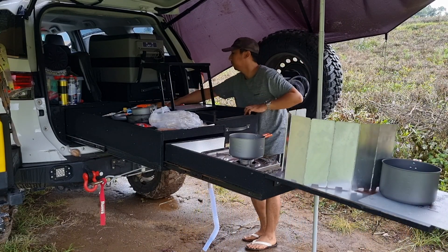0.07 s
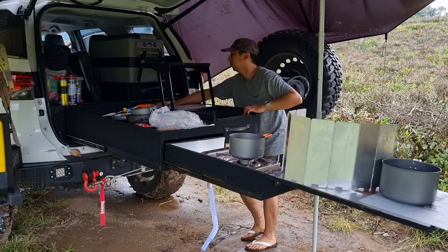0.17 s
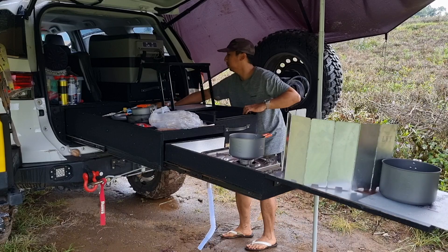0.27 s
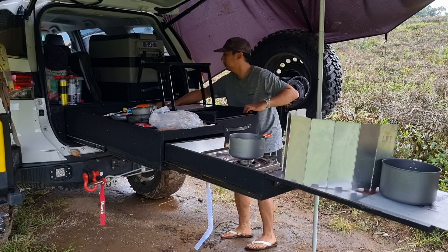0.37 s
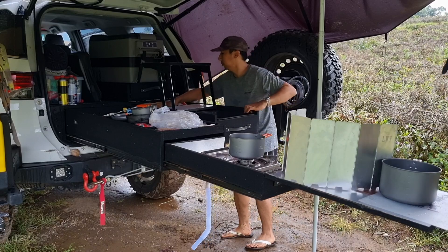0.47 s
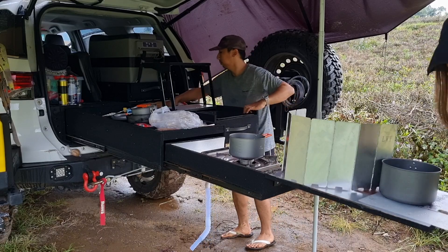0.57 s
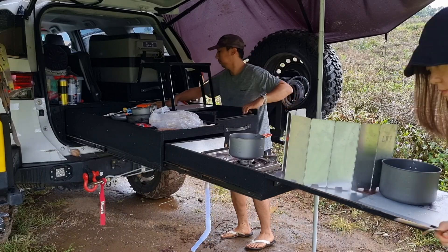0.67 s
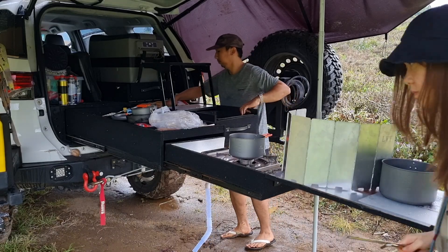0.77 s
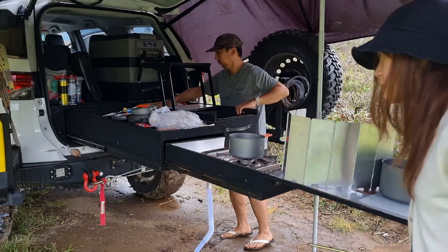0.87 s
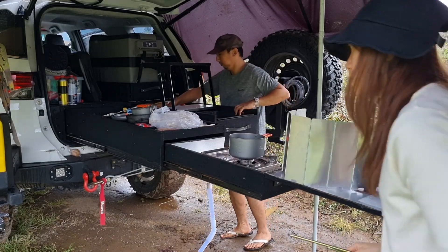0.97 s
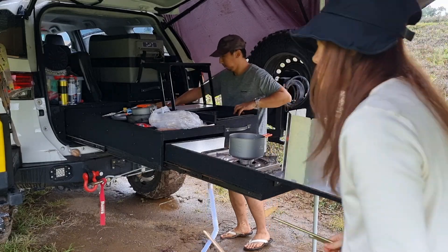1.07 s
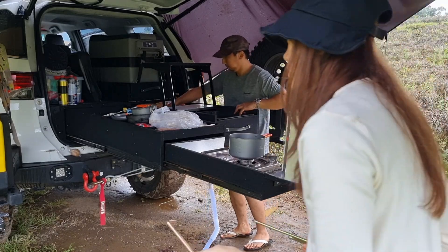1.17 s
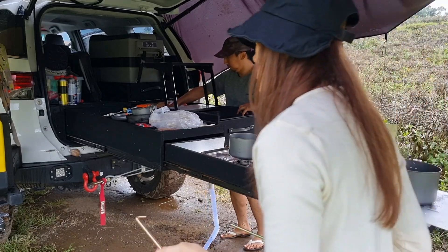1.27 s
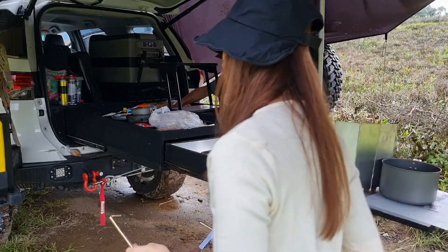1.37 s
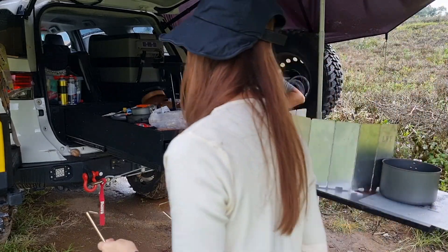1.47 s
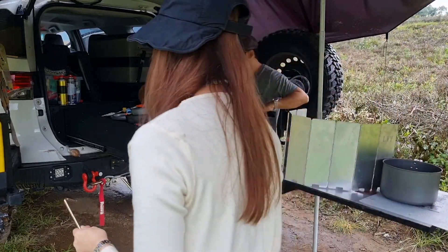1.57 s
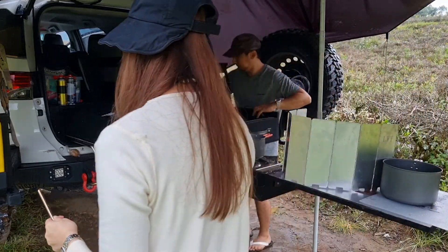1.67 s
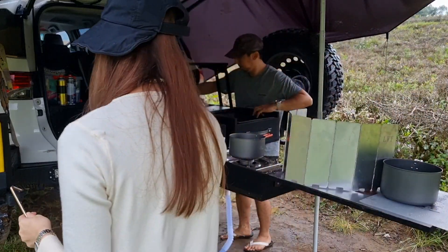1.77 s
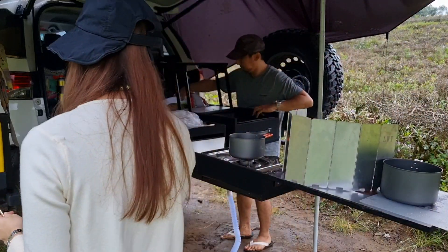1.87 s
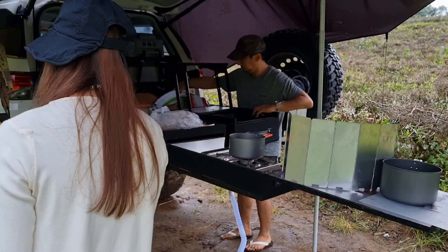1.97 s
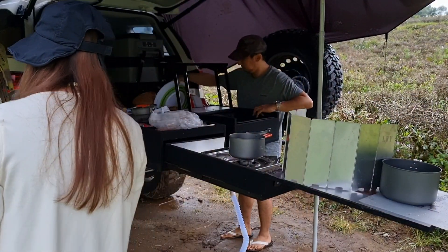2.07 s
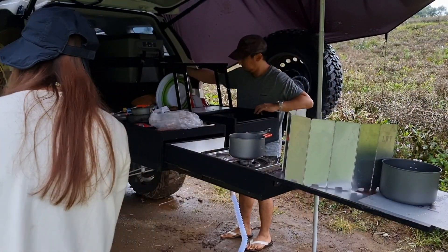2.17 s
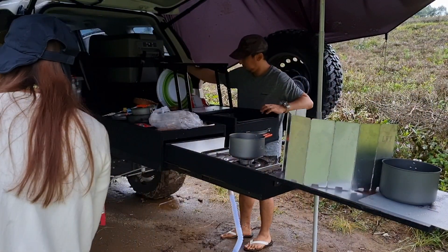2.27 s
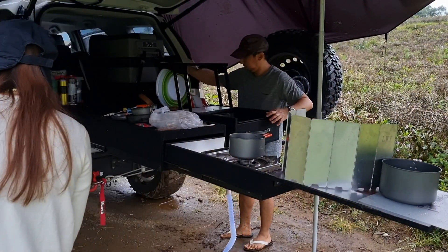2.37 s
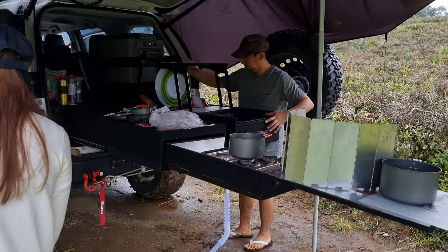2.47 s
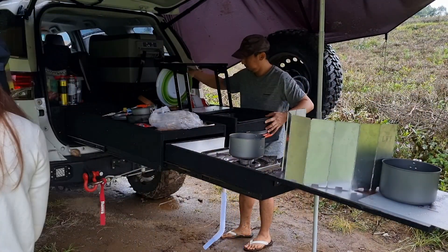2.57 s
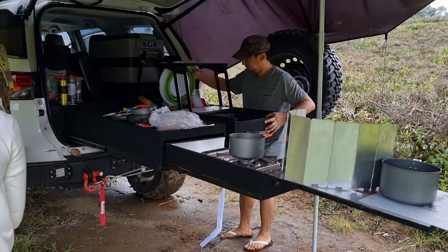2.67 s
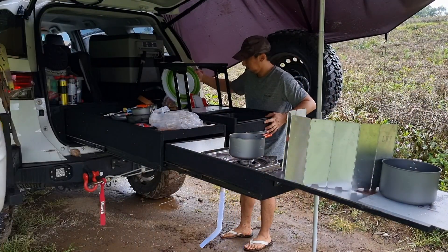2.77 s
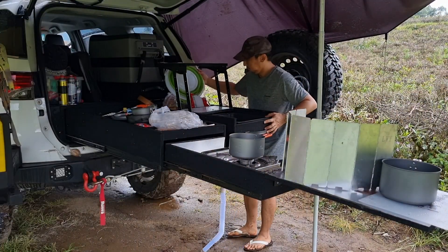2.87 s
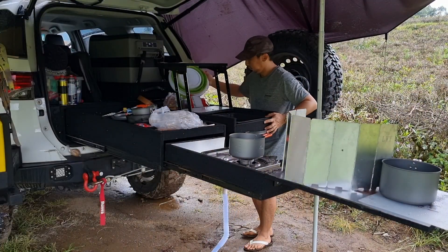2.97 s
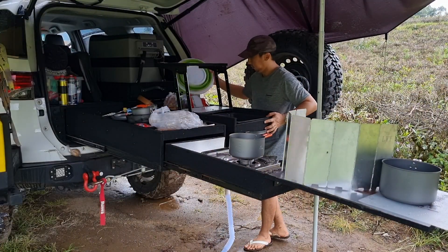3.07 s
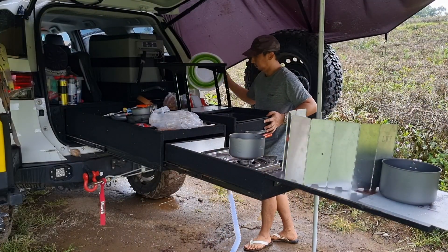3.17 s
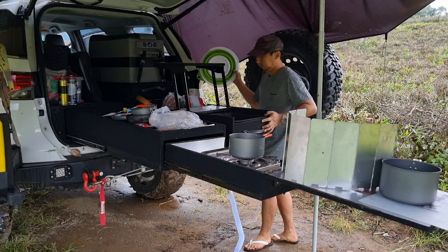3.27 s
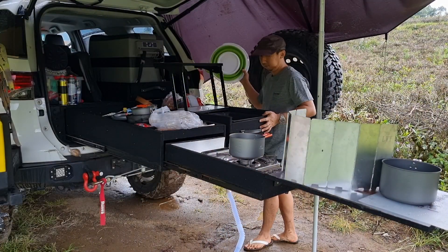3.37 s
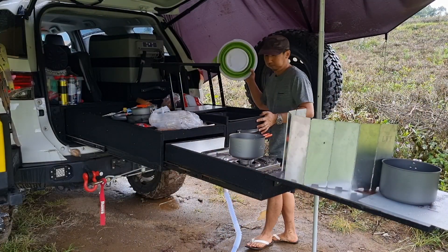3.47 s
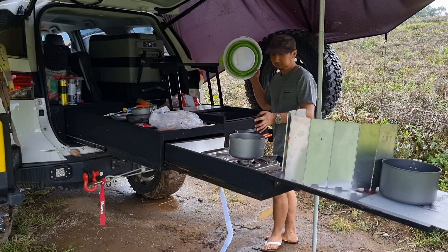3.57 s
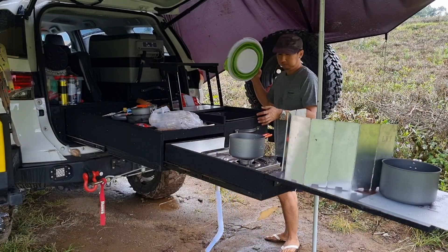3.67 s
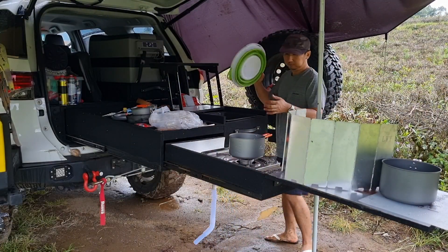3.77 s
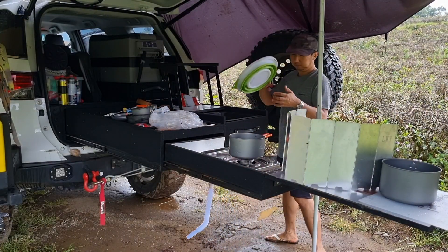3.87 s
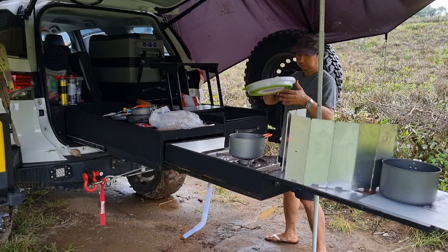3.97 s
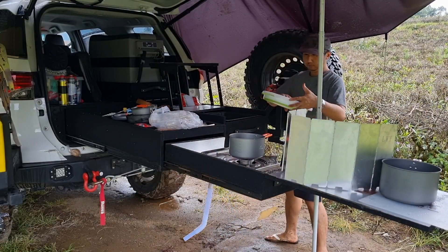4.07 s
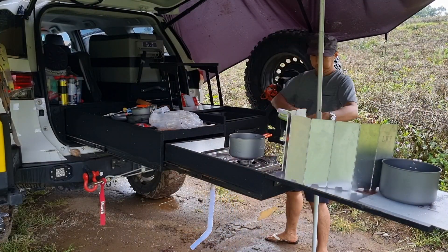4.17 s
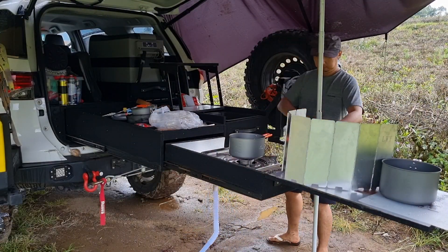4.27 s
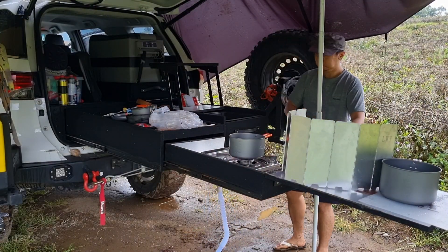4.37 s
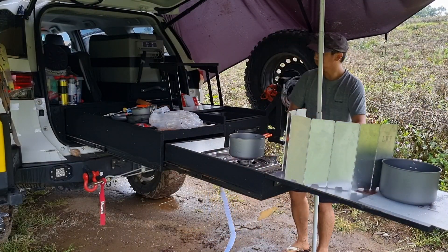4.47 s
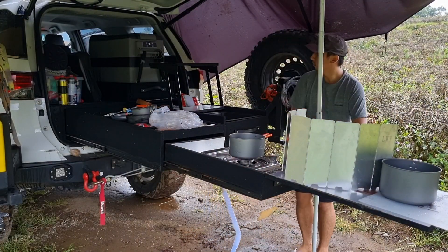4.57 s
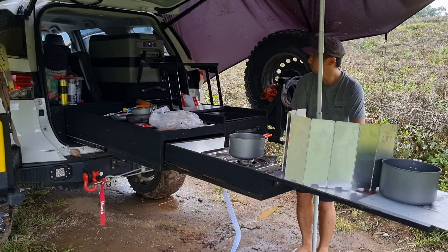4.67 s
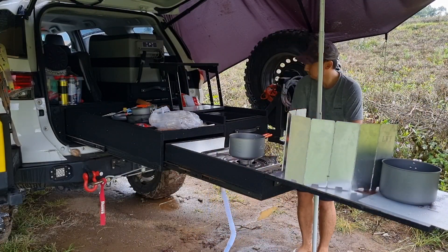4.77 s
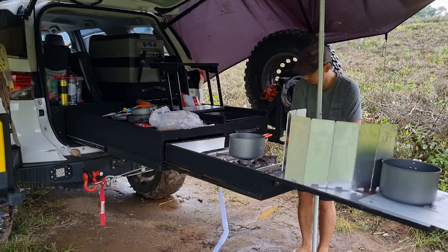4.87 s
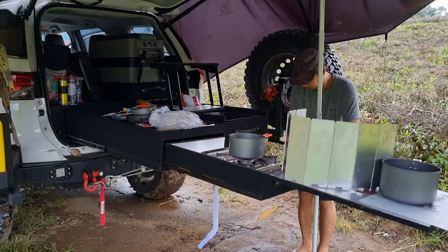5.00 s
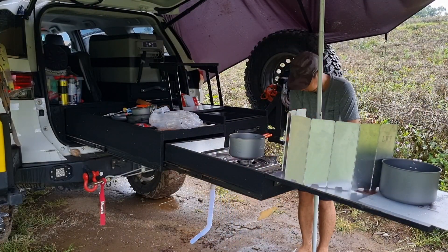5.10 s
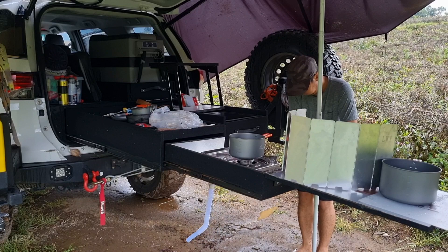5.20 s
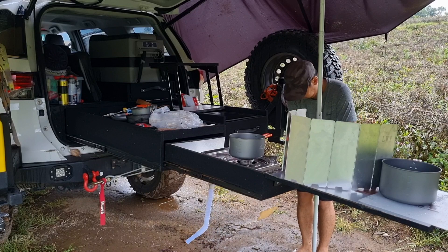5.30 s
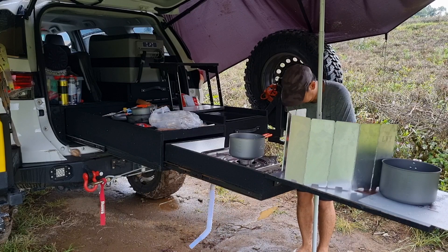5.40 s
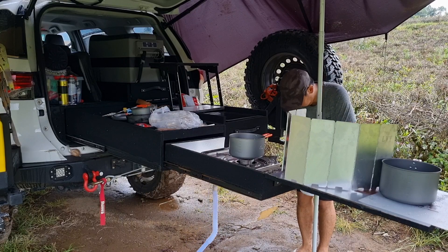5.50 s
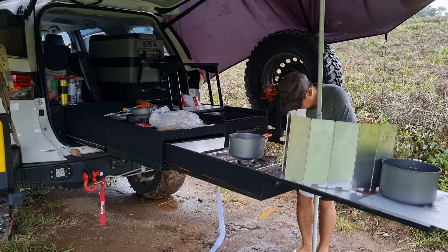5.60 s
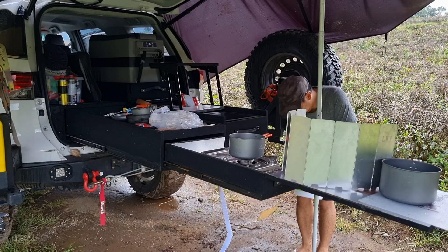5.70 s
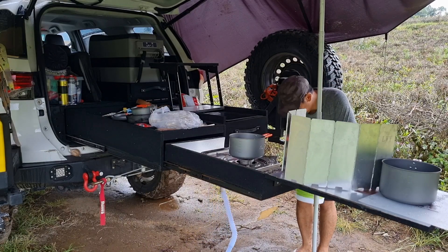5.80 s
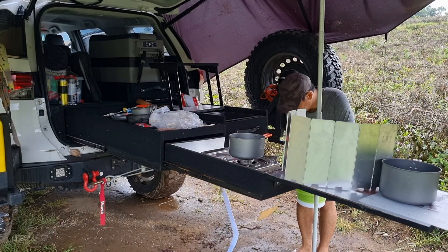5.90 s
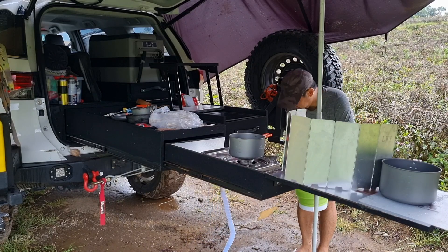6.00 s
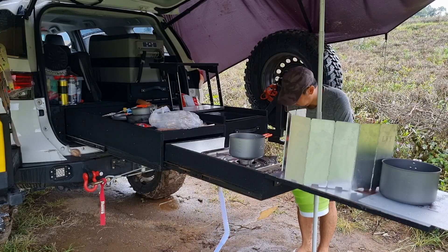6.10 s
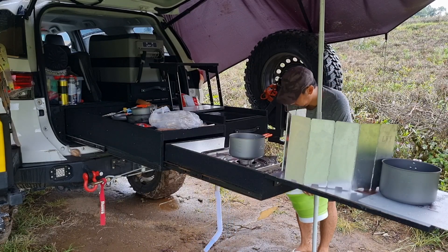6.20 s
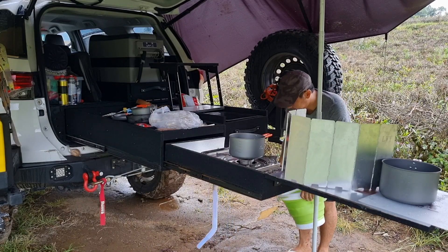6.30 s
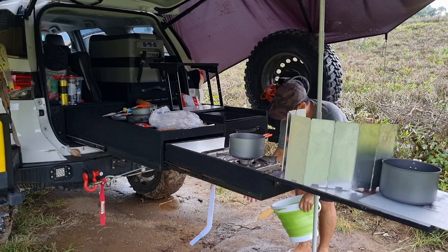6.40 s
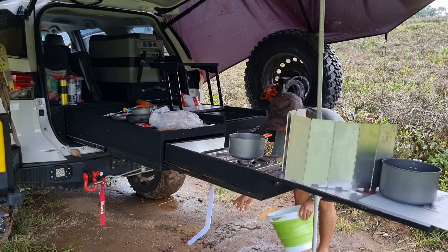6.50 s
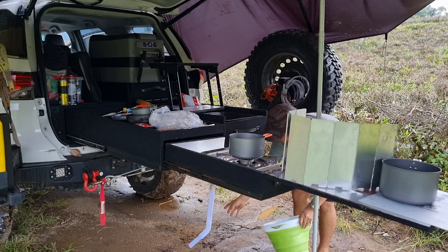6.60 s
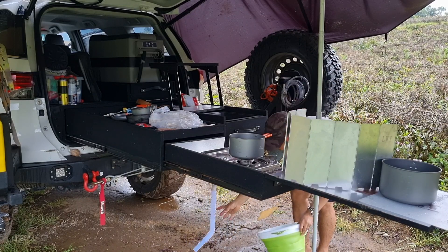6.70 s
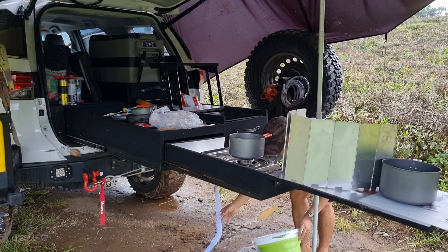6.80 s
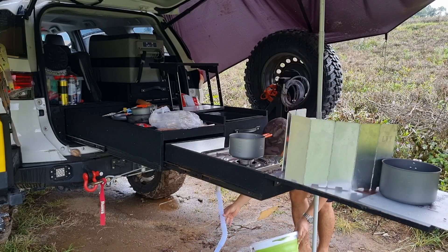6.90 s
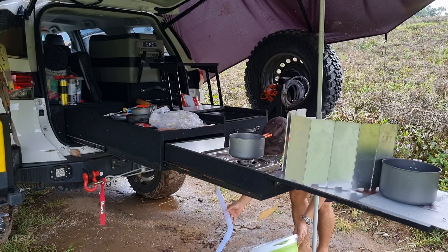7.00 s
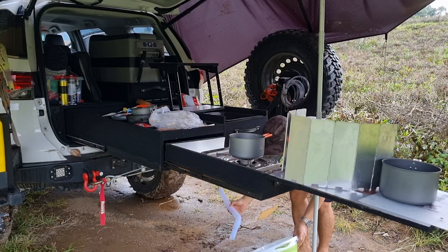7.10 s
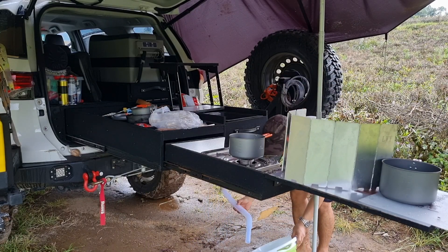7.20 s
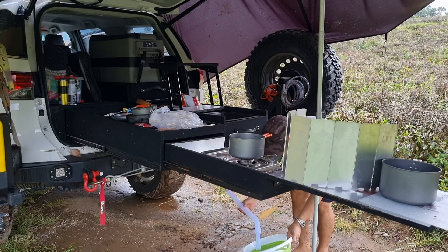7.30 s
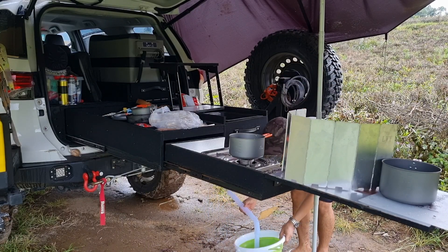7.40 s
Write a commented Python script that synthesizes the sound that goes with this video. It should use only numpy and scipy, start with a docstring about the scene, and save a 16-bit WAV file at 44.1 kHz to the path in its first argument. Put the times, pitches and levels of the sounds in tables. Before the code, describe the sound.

A soft, low outdoor rumble and faint insects run throughout at a camp kitchen. From the start, someone nearby rummages in a drawer: packing crackles, and pans slide with a hollow hum and clack together, busiest between 1.3 and 2.5 seconds. A small bird whistles faintly at about 0.7 seconds. Cloth zips briefly over an edge at 1.4, and light hollow thumps follow around 2.3. After 3 seconds the rustling is quieter. Metal utensils jingle brightly close by at about 3.2 and 4.3, with a sharp knock and thump at 3.7. Between 5.2 and 5.7 a folding plastic tub is pushed open in several hollow thumps, the loudest sounds, its walls springing back among small clinks and distant whistles. One softer knock comes at 6.2. The handling dies away to tiny clinks, and a bird gives a few raspy chirps from 7 seconds.

```python
"""A camp kitchen under an awning, over a low outdoor rumble and insects. From the start someone rummages
in a drawer: pans slide with a hum of friction and clack together, and packing crackles as it creases.
A small bird whistles, cloth zips over an edge, and the first hollow thumps sound. After three seconds
metal utensils jingle close by in their free modes; after five, a folding plastic tub is thumped open,
its walls flexing and springing back. The handling dies away, and a bird chirps near the end."""
import sys
import numpy as np
from scipy import signal
from scipy.fft import rfft, irfft, next_fast_len
from scipy.io import wavfile
from scipy.ndimage import uniform_filter1d

SR = 44100
rng = np.random.default_rng(int(sys.argv[2]) if len(sys.argv) > 2 else 0)


def wav_record(signal):
    """Record a signal, one row per channel, as 16-bit PCM in the file named by sys.argv[1]."""
    frames = np.transpose(np.atleast_2d(signal))
    bounded = np.clip(frames, -1, 1)
    # unit amplitude maps onto the largest positive 16-bit level
    quanta = np.round(bounded * 32767).astype(np.int16)
    wavfile.write(sys.argv[1], SR, quanta)


N = 328545
TIME = np.arange(N) / SR

# Spectra of the open air, the drawer under sliding gear, hard contacts, packing and small handling.
# Each row: frequency in Hz, relative spectral level in dB.
AIR_SPECTRUM = [(20, -34), (32, -16), (48, -3.5), (70, -1), (110, 0), (160, -8), (250, -17.5), (400, -22.5),
                (800, -26.5), (1500, -36.5), (3000, -31), (5000, -42), (8500, -36), (10500, -56),
                (16000, -46)]
DRAWER_SPECTRUM = [(120, -37), (190, -8.5), (260, -2), (340, -1), (520, -3.5), (650, -9), (850, -13),
                   (1250, -17.5), (2000, -30), (3500, -61), (7000, -72)]
CONTACT_SPECTRUM = [(88, -47), (150, 3.5), (309, 5.5), (774, -2), (905, -6), (1340, -4), (1500, -5.5),
                    (1940, -5.5), (2270, -8.5), (6260, -24.5), (16000, -54.5)]
PACKING_SPECTRUM = [(180, -6), (300, -17), (348, 0.5), (418, -34), (624, -6), (1300, -10.5), (1870, -9.5),
                    (3890, -11.5), (11300, -21.5), (14200, -19.5), (16000, -25)]
HANDLING_SPECTRUM = [(400, -20), (900, -8), (1800, -4.5), (3500, -5), (6000, -10.5), (10000, -17.5),
                     (16000, -15)]
# Insect choruses. Each row: centre in Hz, resonator bandwidth in Hz, level in dB.
INSECT_BANDS = [(6450, 230, -82.5), (7960, 700, -80)]
# Hand movements that drag gear, crumple packing and turn things over.
# Each row: time of the peak in seconds, level in dB, swell in seconds, release in seconds.
SHOVE_STROKES = [(.01, -53, 0.057, .15), (.39, -46.5, 0.05, 0.27), (.93, -54, 0.2, .2),
                 (1.345, -39.5, .11, 0.16), (1.52, -38.5, 0.47, 0.41), (1.94, -51.5, 0.15, 0.32),
                 (2.18, -39.5, 0.073, 0.07), (2.42, -46, 0.17, 0.2), (2.77, -53.5, 0.27, 0.11),
                 (3.34, -49.5, 0.29, 0.46), (3.83, -56, 0.2, .2), (4.55, -60, 1, 0.43)]
CRUMPLE_STROKES = [(.19, -43, 0.057, 0.023), (.27, -39, 0.11, 0.021), (.385, -44.5, 0.073, 0.18),
                   (.465, -44.5, 0.24, 0.12), (.55, -54, 0.048, 0.073), (.63, -44.5, 0.084, 0.066),
                   (.76, -48.5, 0.16, .12), (.86, -51, .06, .12), (.92, -44.5, 0.17, 0.12),
                   (1.03, -46.5, 0.28, 0.031), (1.36, -41.5, 0.17, 0.075), (1.7, -43.5, 0.37, 0.16),
                   (1.802, -38, 0.031, .1), (1.855, -39.5, .1, 0.21), (1.92, -39, 0.098, 0.12),
                   (2.14, -36.5, 0.08, 0.093), (2.397, -43.5, 0.009, 0.044), (2.765, -51, 0.017, 0.17)]
HANDLING_STROKES = [(3.4, -64.5, .5, 1.0), (3.79, -53, 0.38, 0.25), (4.5, -64.5, 0.67, 3.1),
                    (5.6, -73, 0.61, 1.5), (6.35, -69, .2, 0.82)]
# Clacks, scuffs and ticks. Each row: start in seconds, level in dB, contact length in seconds,
# tilt in dB per octave, body resonance in Hz.
CONTACTS = [(0.012, -51, 0.02, 2, 1130), (0.237, -46, 0.014, -0.5, 1660), (0.515, -41.5, 0.0037, 16, 5160),
            (0.599, -41, 0.0042, -0.5, 810), (0.711, -43, .003, -8, 663), (1.1695, -45, 0.0017, 5, 2990),
            (1.7763, -37, 0.0024, 9.5, 3080), (2.012, -40, 0.0092, -2.5, 1350),
            (2.044, -43, 0.0018, 10, 3800), (2.105, -37, 0.015, 2.5, 1420), (2.131, -38.5, 0.033, 3, 750),
            (2.333, -45.5, 0.012, -2.5, 1160), (2.389, -41.5, 0.013, 2.5, 2800),
            (2.509, -57, 0.0062, 10, 1090), (2.694, -52.5, 0.0078, 2, 1500), (2.747, -49.5, 0.024, 8, 1840),
            (2.814, -48.5, 0.0072, 10.5, 2030), (2.919, -54.5, 0.004, 1.5, 5000),
            (3.617, -51, 0.0086, 0.5, 940), (3.742, -30, 0.012, 4, 800), (3.794, -53, 0.027, -4, 815),
            (4.038, -55.5, 0.02, -1, 2230), (4.096, -57.5, 0.011, -0.5, 1520),
            (4.288, -54.5, 0.035, 5.5, 2200), (4.419, -44, 0.012, 4, 1650), (4.491, -57, 0.033, 16, 1770),
            (4.619, -48.5, 0.0097, 5.5, 2120), (4.723, -53, 0.024, -2.5, 866),
            (5.1805, -30.5, 0.0027, 1, 3100), (5.186, -38, 0.0047, 4, 920),
            (5.263, -58.5, 0.0098, 14, 3560), (5.383, -43, 0.023, -3, 860), (5.483, -47, 0.023, -4.5, 706),
            (5.644, -34, .011, -5.5, 704), (5.665, -57, 0.05, 0, 1900), (5.901, -51.5, 0.018, 0.5, 1920),
            (6.2105, -50.5, 0.0011, 8, 6500), (6.231, -42, 0.014, 5, 2720),
            (6.995, -59.5, 0.0018, 5.5, 3830)]
# Slurred whistles. Each row: start and length in seconds, first, middle and last pitch in Hz, level in dB.
BIRD_WHISTLES = [(0.726, 0.083, 4080, 3680, 2878, -61), (3.788, 0.047, 3930, 3590, 3150, -65),
                 (3.883, 0.061, 2110, 2510, 2750, -61), (5.02, .21, 3120, 2790, 2760, -73.5),
                 (5.331, 0.16, 1886, 3940, 2680, -68.5), (5.478, 0.043, 2810, 2880, 3100, -72),
                 (5.656, 0.04, 3080, 2350, 1820, -69), (6.884, 0.17, 3480, 3040, 2650, -80),
                 (7.17, 0.047, 3520, 3260, 2720, -79)]
# Raspy double chirps. Each row: start in seconds, level in dB.
BIRD_CHIRPS = [(7.046, -68.5), (7.275, -60.5), (7.358, -59.5), (7.415, -65)]
# Cloth drawn over a smooth edge. Each row: time in seconds, pitch in Hz, level in dB.
ZIP_PATH = [(1.15, 6700, -72), (1.24, 6740, -58), (1.345, 7400, -44), (1.37, 8070, -34), (1.395, 8300, -52),
            (1.43, 8240, -65)]
# Flexes of a plastic wall. Each row: start in seconds, pitch in Hz, peak level in dB,
# rebound in dB against the peak, side partials in dB against the main one.
WALL_FLEXES = [(1.305, 64.5, -42, -20, -12), (2.233, 82, -51, -25, -17), (2.271, 515, -41.5, -8, -8),
               (2.35, 322, -36, -7, -6), (2.419, 293, -38, -8, -7), (2.505, 323, -41, 1, -2.5),
               (3.746, 442, -29.5, -7, -8), (3.764, 308, -36.5, -12, -20), (3.801, 790, -38.5, -6, -20),
               (4.733, 344, -40.5, -2.5, -24), (5.1744, 392, -16, -22, -29), (5.34, 394, -37.5, -30, -21),
               (5.388, 405, -24.5, 0.5, -8.5), (5.3957, 297, -22.5, -12, -15),
               (5.477, 360, -23.5, -24, -26), (5.487, 349, -14, -9, -25), (5.6, 377, -39, -3, -13),
               (5.643, 277.4, -15.5, -15, -13), (5.69, 272, -36.5, -8, -22), (5.716, 342, -42.5, -6, -22),
               (5.922, 366, -42, -11, -25), (6.232, 339, -33.5, -8.5, -35)]
# Side partials of that wall. Each row: multiple of the pitch, relative level in dB.
WALL_PARTIALS = [(.335, -5), (1.58, 1), (2.3, -10)]
# Modes of a utensil. Each row: frequency in Hz, relative level in dB, time to fall 60 dB in seconds.
UTENSIL_MODES = [(2649, -5, 0.093), (3360, -8, 0.19), (3786, -12, .15), (4362, -5.5, 0.057),
                 (4835, -3.5, 0.15), (6300, -12, 0.09), (6438, -4.5, 0.21), (6850, -2, 0.063),
                 (7400, -8, 0.11), (8990, 1, 0.13), (8870, -18, 0.12), (9290, -5, 0.18), (9950, -12, 0.28),
                 (9750, -41, .13), (11490, -0.5, 0.089), (12400, 3, 0.1), (12450, -24, 0.11),
                 (14100, -12, 0.14), (14345, -9, .13), (14800, -15, 0.089), (14700, 4.5, 0.1),
                 (15160, -6, 0.09), (15100, -13, .07)]
# Jingles. Each row: start in seconds, level in dB, chatter length in seconds, leading mode in Hz,
# lift of that mode in dB.
UTENSIL_JINGLES = [(3.119, -60, .036, 9290, -9), (3.154, -44.5, .028, 6438, 18.5),
                   (3.249, -58.5, 0.018, 11490, 9), (3.389, -69, 0.029, 4835, 9),
                   (3.567, -59, 0.023, 4362, 18), (3.63, -68.5, 0.041, 9290, 7),
                   (4.3234, -42.5, 0.047, 6850, 7), (4.59, -65, 0.032, 6850, 19),
                   (4.809, -60, 0.018, 4835, 13), (5.032, -75, 0.01, 9290, 10),
                   (5.617, -50, .022, 4835, 14.5), (5.721, -72.5, .012, 6850, 21),
                   (5.817, -63.5, .028, 4362, 16), (5.9783, -51.5, .018, 7400, 0),
                   (6.844, -63, .008, 4362, 20.5), (6.935, -72, .007, 8870, 25),
                   (7.16, -71, 0.0053, 11490, 14), (7.349, -70, 0.0085, 6850, 21)]


def undb(db):
    """Amplitude grows tenfold for every 20 dB."""
    return 10 ** (np.asarray(db) / 20)


def unit(x):
    """Normalisation to an rms of 1."""
    return x / np.sqrt(np.mean(x ** 2) + 1e-20)


def fade(t, t60):
    """Free vibration decays exponentially, by 60 dB in t60 seconds."""
    return np.exp(-np.log(1000) * t / t60)


def colour(x, spectrum, tilt_db=0):
    """Spectral shaping by a (Hz, dB) curve, tilted by tilt_db per octave."""
    size = next_fast_len(x.shape[-1])
    octave = np.log2(np.fft.rfftfreq(size, 1 / SR) + 1)
    hz, db = np.transpose(spectrum)
    tilt = tilt_db * (np.clip(octave, np.log2(hz[0]), np.log2(hz[-1])) - 10)
    gain = undb(np.interp(octave, np.log2(hz), db) + tilt)
    return irfft(rfft(x, size) * gain, size)[..., :x.shape[-1]]


def resonance(x, hz, width):
    """A damped two-pole resonator passes a band, with gain 1 at its centre."""
    return signal.lfilter(*signal.iirpeak(min(hz, .45 * SR), max(hz / width, .5), fs=SR), x)


def wander(rate, size=N):
    """Smooth random fluctuation of rms 1, with rate new values a second."""
    hold = max(int(SR / rate), 1)
    steps = np.repeat(rng.standard_normal(size // hold + 2), hold)
    return unit(uniform_filter1d(steps, hold))[:size]


def add(out, s, x):
    """Superposition: a sound joins the mix at s seconds."""
    i = max(int(s * SR), 0)
    out[:, i:i + x.shape[-1]] += x[..., :N - i]


def spread(pair, split_hz):
    """Long waves reach left and right alike; above split_hz the two sides lose coherence."""
    hz = np.fft.rfftfreq(pair.shape[-1], 1 / SR)
    apart = hz ** 2 / (hz ** 2 + split_hz ** 2)
    mid, side = irfft(rfft(pair) * np.sqrt([1 - apart / 2, apart / 2]), pair.shape[-1])
    return np.array([mid + side, mid - side])


def grains(size, spread_db):
    """Dense tiny contacts of uneven strength sum to noise, in two independent streams."""
    noise = rng.standard_normal((2, size))
    return unit(noise * undb(spread_db * np.minimum(rng.exponential(size=(2, size)), 7)))


def strokes(rows):
    """Hand movements add in power; each grows tenfold over its swell and falls tenfold over its release."""
    s, db, swell, release = np.transpose(rows)[:, :, None]
    t = TIME[::SR // 1000]
    before, after = (s - t) / swell, (t - s) / release
    # the cube keeps the hand nearly still ahead of its swell
    decades_down = np.maximum(np.maximum(before, before ** 3), after)
    gain = undb(db) * 10 ** -np.minimum(decades_down, 10)
    return np.interp(TIME, t, np.linalg.norm(gain, axis=0))


def awning(x, wet_db, t60):
    """Scattered reflections from car, table and canvas merge into a short reverberant tail."""
    t = TIME[:SR // 2]
    tail = unit(rng.standard_normal((2, len(t))) * fade(t, t60) * (t > .004)) / np.sqrt(len(t))
    return x + undb(wet_db) * signal.fftconvolve(x, tail, axes=1)[:, :N]


def outdoors():
    """Broadband noise gives rumble and thin hiss; many insects sum incoherently to narrow bands."""
    air = unit(spread(colour(rng.standard_normal((2, N)), AIR_SPECTRUM), split_hz=520))
    air *= undb(-55 + 0.3 * wander(7.3))
    for hz, width, db in INSECT_BANDS:
        chorus = resonance(resonance(rng.standard_normal((2, N)), hz, width), hz, width)
        air += unit(chorus) * undb(db + 2.2 * wander(5))
    return air


def sliding():
    """Stick-slip friction: with each shove, dense slips make the hollow drawer hum."""
    slips = spread(colour(grains(N, spread_db=2.5), DRAWER_SPECTRUM), split_hz=740)
    slips[1] = np.roll(slips[1], int(.00012 * SR))  # the drawer is to the left, so the right side lags
    return unit(slips) * strokes(SHOVE_STROKES) * undb(1.65 * wander(45))


def clacks():
    """Forced vibration: a brief scrape drives each piece of hard gear at its body resonances."""
    out, t = np.zeros((2, N)), TIME[:8192]
    for s, db, length, tilt_db, hz in CONTACTS:
        # a longer contact starts more softly and takes longer to die away
        attack, t60 = 0.18 * length, 0.031 + 4.05 * length
        touch = np.minimum(t / attack, 1) * fade(np.maximum(t - length, 0), t60)
        scrape = colour(grains(len(t), spread_db=1.5), CONTACT_SPECTRUM, tilt_db)
        contact = unit(spread(scrape, split_hz=490)) * touch
        body = resonance(contact, hz, hz / 12) + undb(-14) * resonance(contact, 1.535 * hz, hz / 9)
        clack = unit(unit(contact) + undb(-4.5) * unit(body)) * np.sqrt(np.mean(touch ** 2))
        add(out, s, undb(db) * clack)
    return awning(out * undb([[-.9], [.9]]), wet_db=-15, t60=0.29)


def crumple(spectrum, size, patchy_db, snap_db):
    """Buckling: each fold has its own colour, so bands surge independently while single creases snap."""
    out, fibres = 0, grains(size, spread_db=3.1)
    for hz in np.geomspace(300, 14000, num=11):
        snaps = np.zeros((2, size))
        creases = rng.integers(size, size=size // 900)
        snaps[:, creases] = rng.standard_normal((2, len(creases)))
        band = resonance(fibres + undb(snap_db) * unit(snaps), hz, hz / 3)
        out = out + band * undb(patchy_db * wander(55, size))
    return unit(spread(colour(out, spectrum), split_hz=530))


def rustle():
    """Crackle follows the motion of the hands: handfuls of packing for 3 s, then quieter handling."""
    turn, stir_end_s = 3 * SR, 2.524
    faint_stir = undb(-60.5) * fade(np.maximum(TIME - stir_end_s, 0), t60=1)
    packing = crumple(PACKING_SPECTRUM, size=turn, patchy_db=5, snap_db=-9)
    packing *= np.hypot(strokes(CRUMPLE_STROKES), faint_stir)[:turn]
    handling = crumple(HANDLING_SPECTRUM, size=N - turn, patchy_db=4, snap_db=-6)
    handling *= strokes(HANDLING_STROKES)[turn:]
    return np.hstack([packing, handling])


def bird_note(length, arch_hz, rasp):
    """A tone glides through three pitches; random frequency and amplitude modulation roughen it."""
    u = np.linspace(0, 1, int(length * SR))
    glide_hz = np.polyval(np.polyfit([0, .5, 1], arch_hz, 2), u)
    hz = glide_hz * (1 + rasp * wander(800, len(u)))
    envelope = (u * (1 - u)) ** 0.52 * undb(6.6 * wander(135, len(u)))
    return unit(np.sin(2 * np.pi * np.cumsum(hz) / SR) * envelope)


def birds():
    """Distant whistles and double chirps carry more reflected than direct sound."""
    out, pulse_spacing_s = np.zeros((2, N)), .023
    for s, length, *arch_hz, db in BIRD_WHISTLES:
        add(out, s, undb(db) * bird_note(length, arch_hz, rasp=.022))
    for s, db in BIRD_CHIRPS:
        for start in (s, s + pulse_spacing_s):
            add(out, start, undb(db) * bird_note(length=.02, arch_hz=(3020, 3510, 3320), rasp=.14))
    return awning(out, wet_db=2, t60=0.078)


def cloth_zip():
    """Friction of cloth over a smooth edge gives a narrow noise band around a rising pitch."""
    times, hz, db = np.transpose(ZIP_PATH)
    rasp = np.array([wander(2200) + 1j * wander(2200) for _ in range(2)])
    rasp = signal.sosfilt(signal.butter(2, 700, fs=SR, output="sos"), rasp)
    carrier = np.exp(2j * np.pi * np.cumsum(np.interp(TIME, times, hz)) / SR)
    envelope = undb(np.interp(TIME, times, db)) * (TIME > times[0]) * (TIME < times[-1])
    return unit((rasp * carrier).real) * envelope


def thumps():
    """Elastic rebound: a plastic wall flexes for a few low cycles, then springs back once."""
    out, t = np.zeros((2, N)), TIME[:SR // 6]
    swell_cycles, rebound_s = 2.23, .018
    age = np.maximum(t - np.array([[.00016], [0]]), 0)  # the wave reaches the right side first
    for s, hz, db, rebound_db, side_db in WALL_FLEXES:
        u = age * hz / swell_cycles
        push = (u * np.exp(1 - u)) ** 3.3
        ring = undb(-27) * np.minimum(u, 1) ** 2 * fade(age, t60=.09)
        phase = 2 * np.pi * hz * age
        main = np.sin(phase)
        side = sum(undb(partial_db) * np.sin(multiple * phase) for multiple, partial_db in WALL_PARTIALS)
        add(out, s, undb(db) * (push + ring) * (main + undb(side_db) * side))
        add(out, s + rebound_s, undb(db + rebound_db) * (push + ring) * main)
    return awning(out * undb([[-1.1], [.9]]), wet_db=-17.5, t60=0.23)


def utensils():
    """Modal vibration: like metal pieces chatter together, and each contact excites their modes anew."""
    out, t = np.zeros((2, N)), TIME[:SR // 5]
    hz, db, t60 = np.transpose(UTENSIL_MODES)[:, :, None]
    for s, level_db, length, lead_hz, lift_db in UTENSIL_JINGLES:
        lead = np.abs(hz - lead_hz) == np.abs(hz - lead_hz).min()
        tilt_db = 0.12 * (level_db + 54)  # per octave: a harder jingle is brighter
        # the place and hardness of the blow weight the modes
        strength = undb(db + tilt_db * np.log2(hz / hz.mean()) + 2 * rng.standard_normal(hz.shape))
        piece = strength * undb(lift_db * lead) * np.exp(2j * np.pi * hz * t) * fade(t, t60)
        # a neighbouring piece is tuned a little apart and damped by the hand
        detuned_hz = hz * (1 + 0.0129 * rng.standard_normal(hz.shape))
        neighbour = strength * undb(3) * np.exp(2j * np.pi * detuned_hz * t) * fade(t, 0.36 * t60)
        ring, knocks = np.zeros((2, len(t))), np.zeros(len(t))
        for k, when in enumerate(np.linspace(0, length, num=6)):
            i = int(when * rng.uniform(.8, 1) * SR)
            phases = np.exp(2j * np.pi * rng.random((2, len(hz))))  # one for each side and mode
            ring[:, i:] += (phases @ (piece, neighbour)[k % 2]).real[:, :len(t) - i]
            knocks[i:] += fade(t[:len(t) - i], t60=0.092)
        contact_noise = knocks * rng.standard_normal((2, len(t)))
        grate = colour(contact_noise, spectrum=[(1000, -10), (2600, 9), (7000, 13), (16000, 3.5)])
        add(out, s, undb(level_db) * unit(unit(ring) + undb(-13.5) * unit(grate)))
    return awning(out * undb([[-.75], [.75]]), wet_db=-10.5, t60=0.17)


def scene():
    """The pressures of all sources add linearly, left and right."""
    return outdoors() + sliding() + clacks() + rustle() + birds() + cloth_zip() + thumps() + utensils()


def record(dry):
    """Band limiting: a steep low-pass filter removes the treble above 16 kHz."""
    return signal.sosfilt(signal.ellip(10, .2, 70, 16000, fs=SR, output="sos"), dry)


dry = scene()
out = record(dry)
wav_record(out)
```